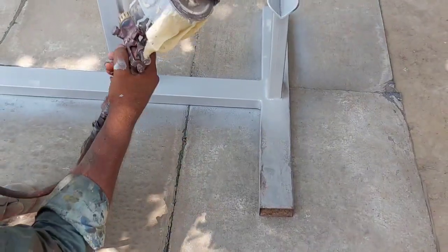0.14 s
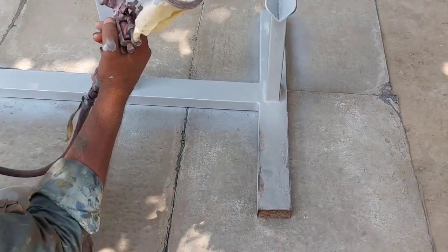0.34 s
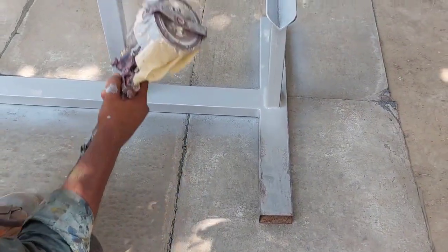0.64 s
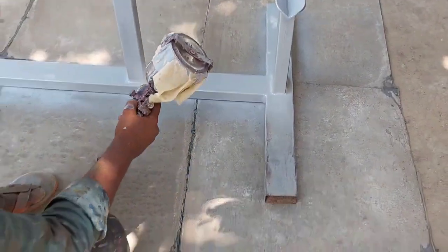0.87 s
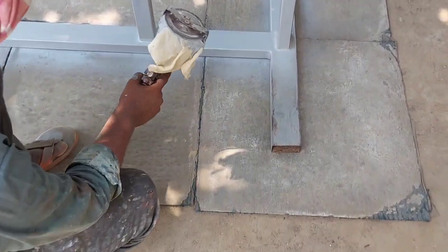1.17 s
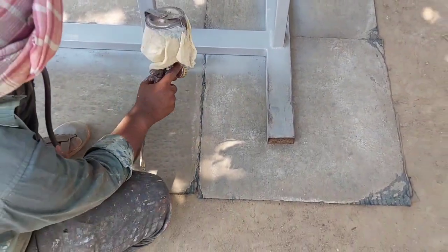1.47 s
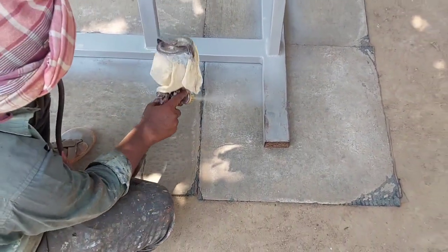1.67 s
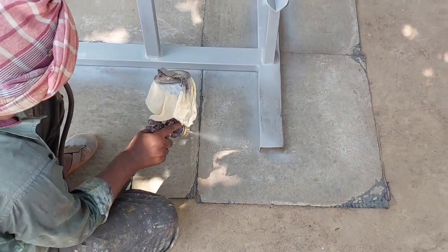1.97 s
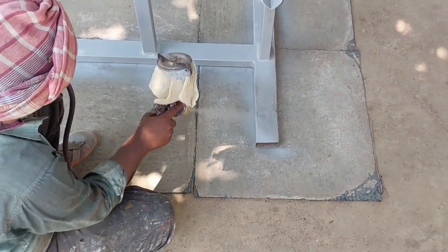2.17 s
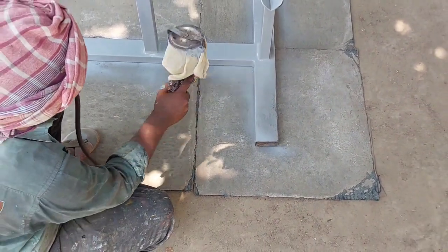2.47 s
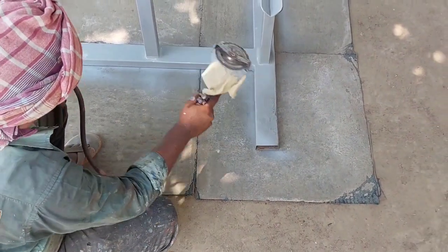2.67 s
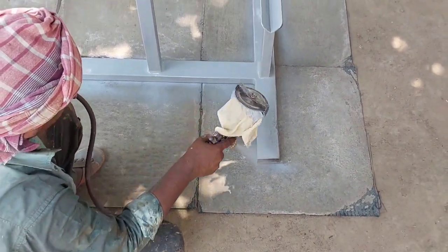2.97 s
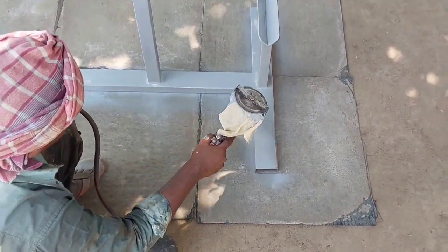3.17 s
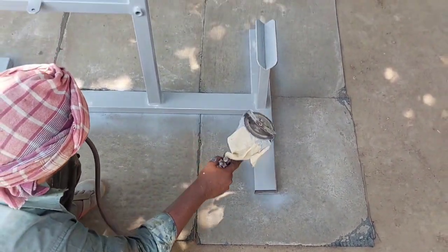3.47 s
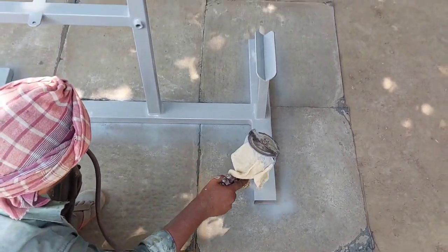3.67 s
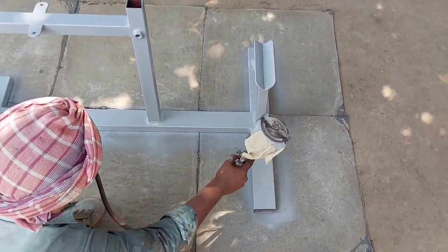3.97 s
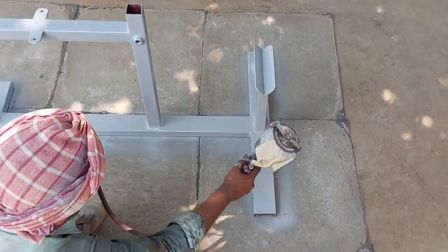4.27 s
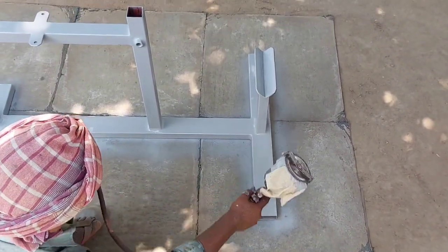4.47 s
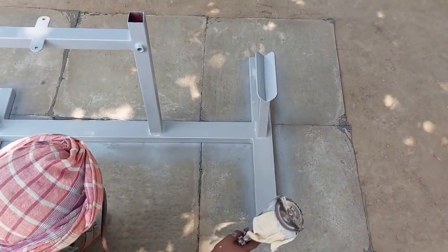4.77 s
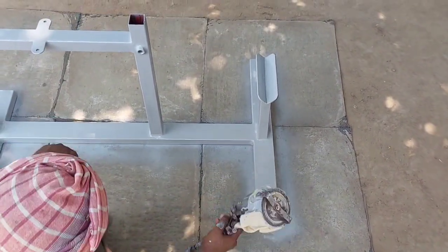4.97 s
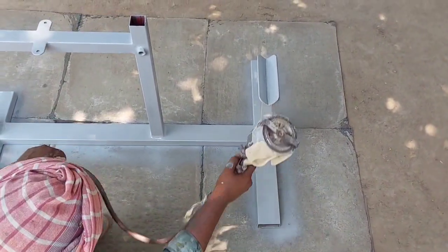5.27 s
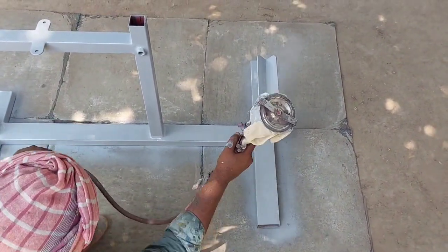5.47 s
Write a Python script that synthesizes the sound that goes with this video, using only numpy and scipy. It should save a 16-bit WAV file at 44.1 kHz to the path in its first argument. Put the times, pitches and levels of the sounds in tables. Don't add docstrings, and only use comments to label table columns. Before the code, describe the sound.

A piston air compressor chugs rapidly and unevenly in an open yard while a paint spray gun hisses thinly, swelling and easing.

```python
import sys
import numpy as np
from scipy import signal
from scipy.fft import irfft
from scipy.io import wavfile
from scipy.ndimage import uniform_filter1d

SR = 44100
rng = np.random.default_rng(int(sys.argv[2]) if len(sys.argv) > 2 else 0)


def bounce(signal):
    frames = np.transpose(np.atleast_2d(signal))
    limited = np.clip(frames, -1, 1)
    pcm = np.round(limited * 32767).astype(np.int16)
    wavfile.write(sys.argv[1], SR, pcm)


def magnitude_from_level(level_db):
    exponent = np.asarray(level_db, float) / 20
    return 10 ** exponent


N = 247842

TURN_MS, STEPS = 78.74, 16384
LAG_S = 0.000371
BODY_LAG_S = 0.00023


def evened(x):
    return x / np.sqrt(np.mean(x ** 2) + 1e-20)


def read(points, hz):
    f, value = np.transpose(points)
    return np.interp(np.log(hz + 1), np.log(f + 1), value)


def curve(rows, column, t):
    return np.interp(t, np.array(rows)[:, 0], np.array(rows)[:, column])


# (t/s, share of the move 0-1)
PHONE_MOVE = [
    (0, 0.05),
    (1.2, 0.13),
    (2.2, 0.54),
    (3.5, 0.99),
    (5.62, 0.95),
]


def moved(t):
    return curve(PHONE_MOVE, 1, t)


CUT_LENGTHS = [14.5, 13, 9.4, 14.6, 18.2, 14.9, 14.9, 16.6, 14.8, 14.7, 4.1, 3.6, 5.1, 9.4, 15.4, 9.3, 11.5,
               19.7, 3.9, 15.2, 3.9, 15.4, 12.2, 4.6, 11.7, 11.5, 19.6, 3.9, 11.7, 9.2, 9.3, 11.8, 4.6,
               11.7, 11.5, 19.6, 11.8, 12, 9.2, 9.2, 11.6, 19.6, 14.6, 9.6, 11.7, 9.2, 4.9, 4.8, 11.6, 19.7]


def played(turn):
    first_cut_ms, crank_at_start_ms = -9, -14.4
    pass_per_cut = 10
    ms = np.arange(N) * 1000 / SR
    lost = np.array(CUT_LENGTHS)
    lost_before = np.cumsum(lost) - lost
    starts = first_cut_ms + pass_per_cut * lost_before
    cut = np.searchsorted(starts, ms) - 1
    after = np.clip((ms - starts[cut]) / lost[cut], 0, 1)
    before_ms = ms + crank_at_start_ms + lost_before[cut]
    out = np.zeros((len(turn), N))
    for weight, place_ms in ((1 - after, before_ms), (after, before_ms + lost[cut])):
        step = np.round(place_ms / TURN_MS * STEPS).astype(int) % STEPS
        out += weight * turn[:, step]
    return out


VALVE_BLOWS = [
    12,
    39,
    42,
    67,
    75,
]


def breath(depth_db, top_ms):
    ms = np.arange(STEPS) * TURN_MS / STEPS
    stroke = 0.76 * np.cos(2 * np.pi * (ms - top_ms) / TURN_MS)
    kicks = sum(np.exp(-((ms - start) % TURN_MS) / 6) for start in VALVE_BLOWS)
    return magnitude_from_level(depth_db * (stroke + kicks))


def noise(level_db, same, lag_s, patchy_db, flicker_db):
    frames = N // 128 + 5
    hz = np.fft.rfftfreq(512, 1 / SR)[:, None]
    a, b, c, d, patches = rng.standard_normal((frames, 257, 5)).T
    flicker = evened(uniform_filter1d(uniform_filter1d(patches[0], size=8), size=8))
    patches = uniform_filter1d(patches, size=8, axis=0)
    patches = evened(uniform_filter1d(patches, size=24, axis=1))
    same = np.clip(read(same, hz), -1, 1)
    right = a + 1j * b
    left = same * right + np.sqrt(1 - same ** 2) * (c + 1j * d)
    left = left * np.exp(-2j * np.pi * hz * lag_s)
    seconds = np.arange(frames) * 128 / SR
    field_db = level_db(hz, seconds) + patchy_db * patches + flicker_db * flicker
    return signal.istft(np.array([left, right]) * magnitude_from_level(field_db), nperseg=512, noverlap=384)[1][:, :N]


# (f/Hz, level/dB per Hz)
RUSH_COLOUR = [(290, -31), (500, 2), (718, 5), (784, 4.5), (1340, -11), (1640, -8), (1980, -13),
               (2570, -19), (3650, -24), (4870, -18.5), (5880, -22.5), (9490, -29), (14500, -22.5),
               (16000, -28)]
# (f/Hz, level/dB)
TILT_AND_COWL = [(25, -33), (60, -8), (140, -13), (230, -7), (380, -5), (520, -13), (850, -11),
                 (1350, -2), (1950, 2), (2300, -2), (3800, 3), (4600, 0), (5030, 3), (5550, -2),
                 (6500, 0)]
# (f/Hz, likeness 0-1)
RUSH_LIKENESS = [(60, 0.84), (300, 0.74), (600, 0.85), (2000, 0.19), (6000, 0.087)]


def rush():
    def level_db(hz, s):
        return read(RUSH_COLOUR, np.maximum(hz, 520)) + read(TILT_AND_COWL, hz)
    air = noise(level_db, RUSH_LIKENESS, LAG_S, 0.62, 0.94)
    motor_side = signal.sosfilt(signal.butter(2, 5500, fs=SR, output="sos"), air)
    pulse = evened(played(breath(2.24, 30.4)[None]))
    mix = air + motor_side * (pulse - 1)
    middle = signal.butter(2, [450, 2500], "bp", fs=SR, output="sos")
    band = signal.sosfilt(middle, mix.mean(0))
    return mix / np.sqrt(np.mean(band ** 2))


# (t/s, flow level/dB, aim left-right level/dB, centre f/Hz)
SPRAY_JET = [(0.0, -64, -4.0, 13900), (0.17, -67, -3, 13300), (0.48, -67, 0.0, 12800),
             (0.67, -65, -5, 13700), (0.92, -59.5, -1.5, 13300), (1.2, -62, 0.5, 13500),
             (1.75, -61.5, -8, 14000), (1.92, -65.5, -3, 13900), (2.52, -62.5, -9, 14000),
             (2.75, -62, -4, 14100), (3.72, -62.5, -2.5, 13900), (3.91, -58, -1, 13800),
             (4.27, -62, -0.5, 13700), (4.49, -59.5, -1, 14200), (4.55, -65, -2.5, 13400),
             (4.8, -60.5, 2, 14100), (4.9, -65.5, -3.5, 14600), (5.62, -67.5, -6, 13700)]


def spray():
    def level_db(hz, s):
        flow = 1.06 * (curve(SPRAY_JET, 1, s) + 63)
        aim, centre = curve(SPRAY_JET, 2, s), curve(SPRAY_JET, 3, s)
        width_hz = np.where(hz > centre + 400, 3600, 2200)
        off = (hz - centre - 400) / width_hz
        hump = magnitude_from_level(-62.5 + flow - 4.3 * off ** 2)
        fizz_db = -73 + 0.9 * flow + 0.93 * (aim + 2.5)
        fizz = magnitude_from_level(fizz_db - 11.0 * ((hz - 9000) / 2200) ** 2)
        hump = hump + magnitude_from_level(-74.5 + flow - ((hz - 12200) / 250) ** 2) * moved(s)
        hump = hump * magnitude_from_level(-3 * np.exp(-((hz - 13100) / 450) ** 2) * moved(s))
        left_over_right_db = 1.8 * aim * np.exp(-((hz - centre) / 1500) ** 2) - 0.4
        pan_db = left_over_right_db * np.array([0.5, -0.5])[:, None, None]
        return 10 * np.log10((hump * magnitude_from_level(pan_db)) ** 2 + fizz ** 2 + 1e-20)
    return magnitude_from_level(-13.5) * noise(level_db, [(8000, 0.2), (15000, 0.31)], 0.000035, 2.05, 1.2)


# (f/Hz, level/dB per Hz)
CLATTER_COLOUR = [(400, 7.5), (520, -7.5), (700, -1.5), (950, -4), (1350, -4), (1650, -9), (1950, -2.5),
                  (2400, -17.5), (3700, -12), (5000, -10.5), (5800, -23), (6500, -42)]


def clatter():
    hz = np.arange(STEPS // 2 + 1) * 1000 / TURN_MS
    a, b, c, d = rng.standard_normal((4, 3, len(hz)))
    right = a + 1j * b
    left = (0.72 * right + 0.43 * (c + 1j * d)) * np.exp(-2j * np.pi * hz * LAG_S)
    colour = magnitude_from_level(read(CLATTER_COLOUR, hz) - 8.5 * np.log2(1 + hz / 1800))
    colour = colour * np.clip((hz - 420) / 900, 0, 1) * (hz < 6500)
    turns = irfft(np.vstack([left, right]) * colour) * breath(2.7, 40.6)
    views = played(turns).reshape(2, 3, N)
    place = np.linspace(0, 2, N)
    window = np.cos(np.pi / 2 * np.clip(place - np.arange(3)[:, None], -1, 1))
    return evened((views * window).sum(1))


def ringing(rings, left_db):
    lag_ms = np.array([[1000 * BODY_LAG_S], [0]])
    ms = np.arange(STEPS) * TURN_MS / STEPS - lag_ms
    turn = np.zeros((2, 2, STEPS))
    for start, hz, swell_ms, *db in rings:
        for turns_ago in range(3):
            age_ms = (ms - start) % TURN_MS + turns_ago * TURN_MS
            swell = age_ms / swell_ms * np.exp(1 - age_ms / swell_ms)
            ring = swell * np.sin(2 * np.pi * hz * age_ms / 1000)
            turn += magnitude_from_level(db)[:, None, None] * ring
    first, later = played(turn.reshape(4, -1)).reshape(2, 2, N)
    share = moved(np.arange(N) / SR)
    both = (1 - share) * evened(first) + share * evened(later)
    return both * magnitude_from_level([[left_db / 2], [-left_db / 2]])


# (start t/ms, f/Hz, swell t/ms, first level/dB, level/dB after the move)
TANK_RINGS = [
    (22.4, 88.6, 18.0, -2.0, -2.0),
    (31.81, 144.8, 15.7, -4.0, -5.5),
    (56.42, 72.7, 22.9, -11.0, -10.0),
    (38.55, 96.8, 10.2, -7.0, -2.5),
]


def tank():
    return ringing(TANK_RINGS, -2.2)


# (start t/ms, f/Hz, swell t/ms, first level/dB, level/dB after the move)
BODY_RINGS = [(59.77, 207.5, 26.1, 3.5, 1.0), (28.43, 222.0, 25.0, 4.0, 0.5),
              (25.33, 259.1, 18.1, -0.0, -35.0), (2.64, 255.9, 26.1, -10.0, -1.5),
              (49.09, 262.7, 3.8, 9.5, 8.5), (53.56, 306.8, 9.9, 2.5, -6.5),
              (3.61, 295.9, 14.9, -35.0, -5.5), (68.41, 337.9, 26.1, -0.5, -10.5),
              (53.53, 351.8, 16.9, -31.5, -2.5), (40.87, 411.9, 26.1, -15.0, -8.5),
              (78.47, 338.2, 3.7, -1.0, -34.0), (51.13, 479.2, 8.3, -20.0, -8.5),
              (45.29, 597.4, 17.2, -17, 3.5), (56.43, 725, 2.5, -32.5, -6.5),
               (28.66, 662.7, 16.2, -23.5, -19), (9.29, 399.2, 7, -6, -8.5),
               (65.25, 829.4, 2.5, -32.5, -14.5), (31.47, 602.9, 20, -34.5, 2.5),
               (4.58, 515.7, 16.8, -24, -15), (57.1, 717, 6.6, -13.5, -33.5),
               (30.52, 589.8, 18.3, -12.5, 0.5), (40.49, 816.5, 5.6, -35, -13),
               (16.36, 727, 19.1, -34.5, -22.5), (36.3, 960, 2.5, -35, -14),
              (67.27, 1200, 9.1, -25, -19.5), (56, 1231, 7.4, -33, -21.5), (10.02, 1600, 12, -21, -23),
               (10.96, 1660, 7.4, -25, -29), (38, 1400, 7.4, -29, -31), (11.1, 1500, 10, -27, -26),
               (30, 1950, 8, -24, -20), (36.1, 860, 16, -18, -33), (19.83, 1043, 19, -29, -22),
               (41, 3000, 7.9, -36, -17)]


def intake_frame_and_valves():
    return ringing(BODY_RINGS, -0.8)


# (first level/dB, level/dB after the move)
PART_LEVELS = [
    (-50.5, -50),
    (-40.5, -42.5),
    (-55.5, -53.5),
]


def scene():
    share = moved(np.arange(N) / SR)
    thud, boom, rattle = (magnitude_from_level(first + (later - first) * share) for first, later in PART_LEVELS)
    upper = magnitude_from_level(-4.0) * rush() + magnitude_from_level(-2.5) * clatter()
    return spray() + rattle * upper + boom * intake_frame_and_valves() + thud * tank()


def low_pass(x):
    return signal.sosfilt(signal.butter(12, 15790, fs=SR, output="sos"), x)


def record(dry):
    mix = signal.sosfilt(signal.butter(2, 45, "hp", fs=SR, output="sos"), dry)
    return low_pass(mix)


dry = scene()
out = record(dry)
bounce(out)
```